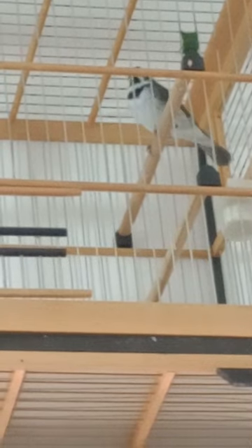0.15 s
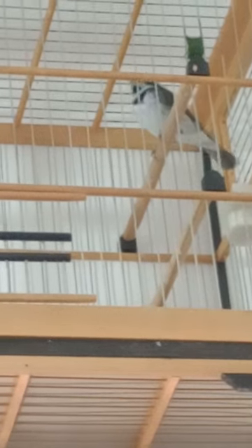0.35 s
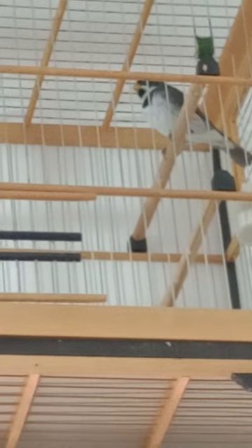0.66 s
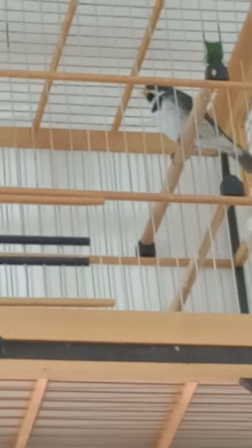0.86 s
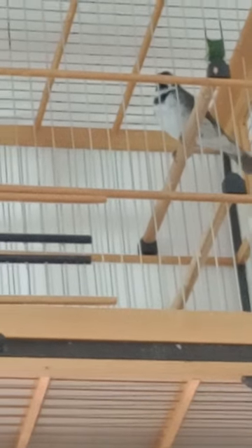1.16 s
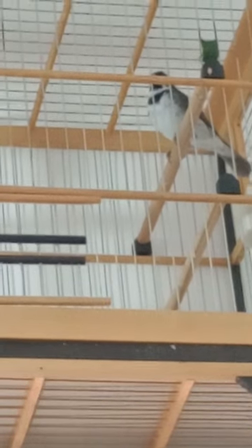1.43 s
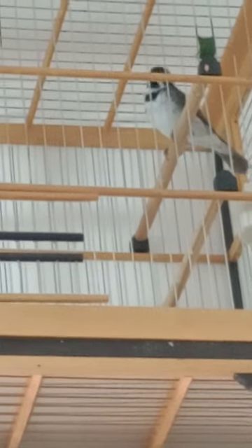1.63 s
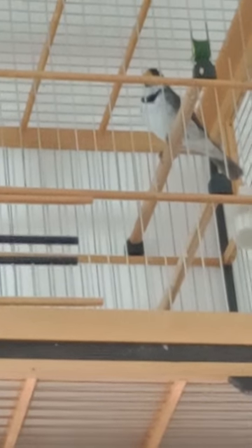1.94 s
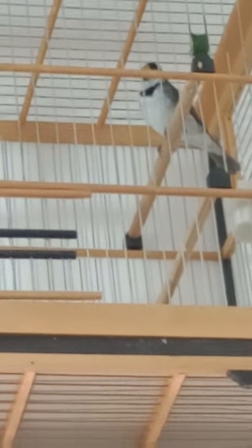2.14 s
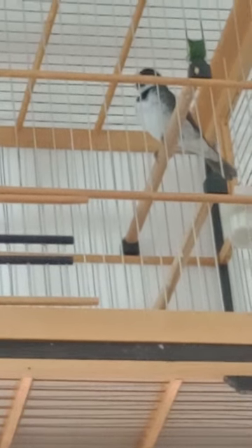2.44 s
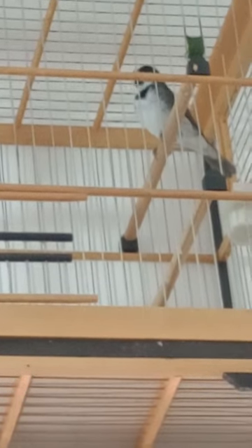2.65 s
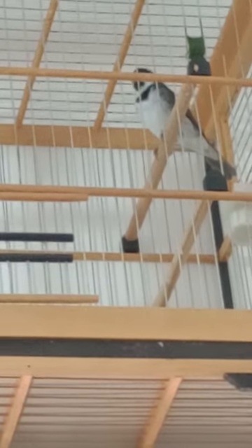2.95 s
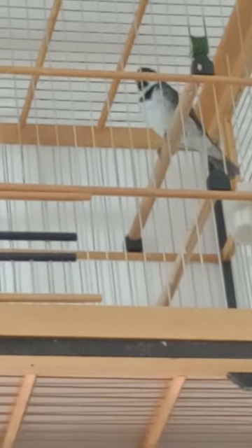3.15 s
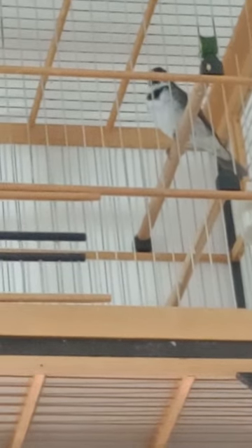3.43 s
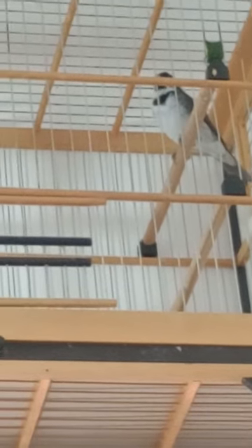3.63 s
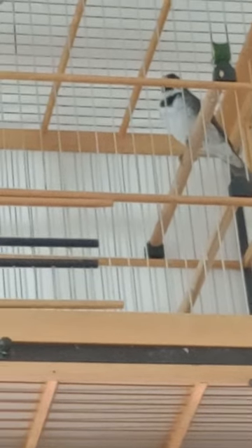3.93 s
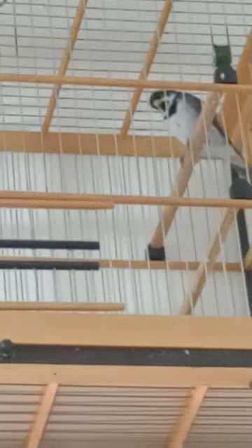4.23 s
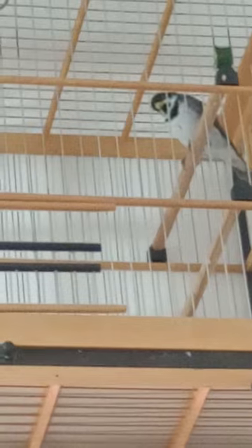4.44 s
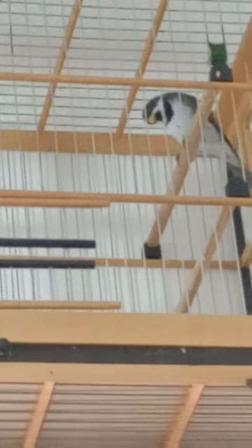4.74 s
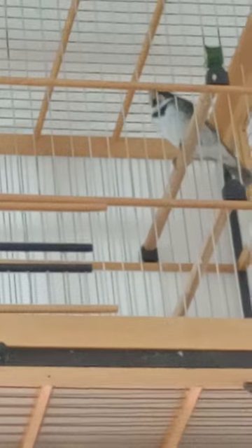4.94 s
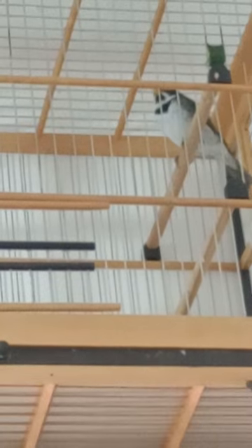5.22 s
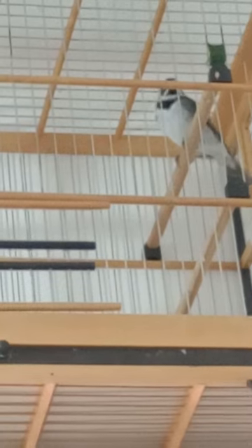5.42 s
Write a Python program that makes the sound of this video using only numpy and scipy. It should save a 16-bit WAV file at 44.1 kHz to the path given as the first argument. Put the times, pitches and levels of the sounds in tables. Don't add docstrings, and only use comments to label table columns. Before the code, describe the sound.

A small caged finch sings one varied phrase: chip, buzzes, fast trill, rising whistles, tumbling notes, then four slow falling slurs.

```python
import sys
import numpy as np
from scipy import signal
from scipy.io import wavfile
from scipy.ndimage import uniform_filter1d

SR = 44100
rng = np.random.default_rng(int(sys.argv[2]) if len(sys.argv) > 2 else 0)


def how_loud(loudness_db):
    steps = np.asarray(loudness_db, float) / 20
    return 10 ** steps


def wav_out(sig):
    wavfile.write(sys.argv[1], SR, np.round(np.clip(np.atleast_2d(sig).T, -1, 1) * 32767).astype(np.int16))


N = 246078

PURE_DB = [0, -28, -34]
PIP_OVERTONES_DB = [-4.5, -6.5, -12, -3.5, 0.5]
# seconds from its start, pitch in Hz, effort in dB, warble in Hz.
PIP = [(-.009, 1348, -47, 0), (-.005, 1480, -30.5, 0), (-.001, 1500, -22.5, 0)]
# frequency in Hz, gain in dB.
BEAK = [(3000, 7), (5500, -13.5), (6800, 2), (7600, -0.5), (8600, -2), (9800, -4), (11500, 2), (13000, 1.5),
        (16000, -4)]


def evened(x):
    return x / np.sqrt(np.mean(x ** 2) + 1e-20)


def read(points, hz):
    f, value = np.transpose(points)
    return np.interp(np.log(hz + 1), np.log(f + 1), value)


def add(mix, start_s, sound):
    part = mix[round(start_s * SR):][:len(sound)]
    part += sound[:len(part)]


def smooth(x, width_s):
    return uniform_filter1d(x, max(round(width_s * SR), 1), mode="nearest")


def wander(count, width_s):
    x, size = rng.standard_normal((count, SR // 2)), round(width_s * SR)
    x = uniform_filter1d(x, size, mode="wrap")
    return evened(uniform_filter1d(x, size, mode="wrap"))


def hush():
    # frequency in Hz, level in dB.
    floor = [(12, -56.5), (20, -22), (37, -17), (85, -3), (406, -11), (454, -6.5), (494, -13), (600, -12.5),
             (1880, -20), (2490, -18.5), (2780, -20), (3670, -21.5), (15600, -26.5)]
    # time in seconds, level in dB.
    rumble = [(0, -75.5), (1.5, -74), (3, -73.5), (4.5, -72), (5.58, -69)]
    level_db, size, hop = -64.5, 1024, 256
    frames, hz = N // hop + 5, np.fft.rfftfreq(size, 1 / SR)
    real, imag, patches = rng.standard_normal((frames, 513, 3)).T
    patches = evened(uniform_filter1d(uniform_filter1d(patches, 20, 0), 16, 1))
    s, rumble_db = np.transpose(rumble)
    swell_db = np.interp(np.arange(frames) * hop / SR, s, rumble_db - rumble_db.mean())
    low = 1 / (1 + (hz[:, None] / 300) ** 2)
    shape_db = read(floor, hz)[:, None] + low * swell_db + 0.61 * (-0.5 - low) * patches
    z = (real + 1j * imag) * how_loud(shape_db)
    noise = signal.istft(z, nperseg=size, noverlap=size - hop)[1][:N]
    return how_loud(level_db) * evened(noise)


def ticks():
    # start in seconds, level in dB, centre in Hz.
    rows = [(.28, -57, 2970), (1.792, -49, 1480), (2.45, -57, 1400), (2.87, -55.5, 1400),
            (3.474, -49, 3000), (3.799, -58, 2924)]
    out, t = np.zeros(N), np.arange(1200) / SR
    for start_s, level_db, hz in rows:
        band = signal.butter(1, [hz / 4.5, min(hz * 4.0, 18000)], "band", fs=SR)
        puff = evened(signal.lfilter(*band, rng.standard_normal(len(t))))
        add(out, start_s, how_loud(level_db) * puff * np.exp(-t / 0.0076))
    return out


def voice(hz, effort_db, depth_hz, overtones_db, beak=BEAK):
    warble_hz, warble_chance, jitter_hz = 104.5, .3, 18
    breath_db, patchy_db, edge_s = -30.5, 2, 0.0022
    t, chance = np.arange(len(hz)) / SR, rng.standard_normal(SR // 2)
    uneven = np.tanh(wander(1, .0015)[0])[:len(t)]
    warble = np.sin(2 * np.pi * warble_hz * t) + warble_chance * uneven
    hz = hz + depth_hz * warble + jitter_hz * uneven
    turn = 2 * np.pi * np.cumsum(hz) / SR
    flicker_db = patchy_db * wander(8, 0.014)[:, :len(t)]
    tone = np.zeros(len(t))
    for k, db in enumerate(overtones_db, 1):
        colour_db = (k > 1) * (read(beak, k * hz) + flicker_db[k])
        tone += how_loud(db + colour_db) * (k * hz < 19000) * np.sin(k * turn)
    air = how_loud(breath_db) * np.sqrt(np.abs(depth_hz) / 500) * np.diff(chance[:len(t)], prepend=0)
    edge = np.clip(np.minimum(t, t[::-1]) / edge_s, 0, 1)
    return how_loud(effort_db) * (np.sqrt(2) * tone + air) * np.sin(edge * np.pi / 2) ** 2


def whistle(mix, rows, overtones_db, start_s=0, factor=1, db=0, beak=BEAK):
    s, *curves = np.transpose(rows)
    t = np.arange(s[0], s[-1], 1 / SR)
    round_s = min(0.073 * (s[-1] - s[0]), .012)
    hz, effort_db, depth_hz = (smooth(np.interp(t, s, c), round_s) for c in curves)
    add(mix, start_s + s[0], voice(factor * hz, effort_db + db, depth_hz, overtones_db, beak))


def glide(mix, start_s, length_s, first_hz, last_hz, db, kind, overtones_db):
    # (share of the note at full effort, entry in dB, swell roundness, exit in dB, fade roundness).
    kinds = dict(flick=((1.1, 3, 0), (.8, -7, .6, -28, 1.1)), blip=((1.1, 2.1, 0),
             (.03, -1, 1.1, -25, .65)), drop=((1.35, 2.2, 0), (.22, -1.5, 1.1, -3.5, .8)),
             hook=((1.1, 1.1, 160), (.97, -22, 1.15, -1, 1.1)), catch=((1.1, 2.2, 130),
             (.7, -17, 1.1, -9, 1.1)), land=((1.5, 1.5, 0), (.25, -4, 1.1, -11, 1.1)), thin=((1.1, 1.1, 0),
             (.95, -6.5, 1.2, -1, 1.1)), short_slur=((1.15, 1.8, 0), (.5, -20, 3, -20, 1.8)),
             long_slur=((.9, 1.15, 0), (.3, -27, 3, -22, 1.35)), late_slur=((2.1, 1.4, 0),
             (.45, -17, 4.5, -18, 2.2)))
    (linger, ease, warble_hz), (crest, entry_db, swell, exit_db, fade) = kinds[kind]
    u, crest = np.linspace(0, 1, num=40), np.clip(crest, .02, .98)
    way = 1 - (1 - u ** linger) ** ease
    hz = first_hz * (last_hz / first_hz) ** way
    swell_db = entry_db * np.clip(1 - u / crest, 0, 1) ** swell
    fade_db = exit_db * np.clip((u - crest) / (1 - crest), 0, 1) ** fade
    rows = np.transpose([u * length_s, hz, swell_db + fade_db, warble_hz * np.sqrt(way)])
    whistle(mix, rows, overtones_db, start_s, db=db)


def chip(song):
    chip_db = [0, -17.5]
    # start in seconds, length in seconds, first Hz, last Hz, effort in dB.
    rise = (.433, .019, 6280, 7480, -27)
    end = (.450, .011, 6000, 6800, -31)
    glide(song, *rise, "flick", chip_db)
    glide(song, *end, "blip", chip_db)


def buzz(song, start_s, length_s, top_hz, effort_db, period_s):
    # share of the period, pitch factor, effort in dB.
    sag = [(0, .55, -9.5), (.1, .86, 0), (.22, .98, 0), (.55, 1, -0.5), (0.799, .8, 1.5), (0.969, 0.57, -9)]
    buzz_db = [1, -7, -5, -9.5, -9, -21]
    # frequency in Hz, gain in dB.
    buzz_beak = [(2500, -9), (3700, 18), (5000, 2.5), (6300, -0.5), (7300, 8), (8500, 5.5), (9600, 1.5),
                 (11700, 5), (13300, -5), (16000, -15.5)]
    entry_factor, warble_hz, pace_chance = .43, 75, .08
    arch_share, fade_db = .03, -1.5
    t = np.arange(0, length_s, 1 / SR)
    share, factor, sag_db = np.transpose(sag)
    drift = wander(1, .02)[0, :len(t)]
    place = (t / period_s + pace_chance * drift * np.minimum(t / period_s, 1)) % 1
    entry = np.interp(t, [0, share[1] * period_s], [entry_factor / factor[0], 1])
    arch = 1 - arch_share * (2 * t / length_s - 1) ** 2
    hz = top_hz * arch * entry * smooth(np.interp(place, share, factor), 0.0023)
    db = effort_db + fade_db * t / length_s + smooth(np.interp(place, share, sag_db), 0.0011)
    add(song, start_s, voice(hz, db, warble_hz, buzz_db, buzz_beak))


def buzzes(song):
    # start in seconds, length in seconds, top pitch in Hz, effort in dB, sag period in seconds.
    rows = [(.713, .217, 2900, -48.5, .036), (.998, .177, 2940, -45.5, .0425),
            (1.208, .147, 3020, -43.5, .042)]
    for row in rows:
        whistle(song, PIP, PIP_OVERTONES_DB, row[0] + .008, .9, row[3] + 20)
        buzz(song, *row)


def trill(song):
    # seconds after its start, pitch in Hz, effort in dB, warble in Hz.
    syllable = [(0, 4145, 5, 58), (.007, 5140, -1.5, 100.5), (0.012, 6356, 7, -3.5), (0.014, 6540, 4.5, -1),
                (0.018, 5540, 1, 297.5), (.027, 4415, .5, 351.5), (.034, 3700, -2.5, 104),
                (.046, 3248, -4.5, 58.5), (0.054, 2793, -12, -1.5)]
    # start in seconds, pitch factor, effort in dB.
    repeats = [(1.397, 0.95, -32.5), (1.472, 0.99, -31.5), (1.552, 0.97, -31.5), (1.636, 1, -30),
               (1.72, 0.99, -30), (1.805, 0.96, -31), (1.891, 0.96, -29.5)]
    trill_db = [-1, -16.5, -29.5, -34.5]
    # frequency in Hz, gain in dB.
    trill_beak = [(5500, -2), (6900, 5), (7500, -2), (8800, -15), (10200, -5), (12500, -6), (14000, -12),
                  (16000, -16)]
    for start_s, factor, db in repeats:
        whistle(song, syllable, trill_db, start_s, factor, db, trill_beak)
        whistle(song, PIP, PIP_OVERTONES_DB, start_s, factor, db)


def lifts(song):
    # time in seconds, pitch in Hz, effort in dB.
    paths = [
        [(1.981, 2820, -33.5), (2.04, 3000, -27), (2.08, 3370, -22.5), (2.11, 3794, -14), (2.14, 3798, -24.5),
         (2.165, 3860, -46.5)],
        [(2.187, 2737, -40), (2.22, 2963, -25.5), (2.26, 3014, -30), (2.285, 3580, -20.5), (2.32, 3820, -18),
         (2.35, 3720, -28.5), (2.368, 3800, -60)],
    ]
    lift_db = [-3, -39.5, -34.5, -46.5, -46]
    # start in seconds, length in seconds, first Hz, last Hz, effort in dB.
    flare = (2.186, .03, 5560, 5760, -38)
    for rows in paths:
        whistle(song, [(*row, 0) for row in rows], lift_db)
    glide(song, *flare, "blip", [0])


def tumble(song, start_s, pace, factor, hook_db, landing_db):
    # seconds after the start, length in seconds, first Hz, last Hz, effort in dB.
    path = [
        (0, .063, 6700, 4950, -20.5),
        (.061, .022, 3750, 4800, -13),
        (.077, .032, 3250, 4200, -19.5),
        (.11, .047, 3350, 2880, -21.5),
        (.057, .043, 8200, 13000, -57.5),
    ]
    hooked_db = [0, -28.5, -29.5]
    parts = (("drop", PURE_DB, 0), ("hook", hooked_db, hook_db), ("catch", hooked_db, 0),
             ("land", PURE_DB, landing_db), ("thin", [0], 0))
    for (s, length_s, first_hz, last_hz, db), (kind, overtones_db, push_db) in zip(path, parts):
        glide(song, start_s + pace * s, pace * length_s, first_hz, factor * last_hz, db + push_db,
              kind, overtones_db)


def tumbles(song):
    # start in seconds, pace factor, factor on the last pitches, first hook in dB, landing in dB.
    rows = [(2.382, .92, 1.06, -8, -1.5), (2.576, 1.01, 1.01, .1, .1), (2.774, .99, .98, -2.5, -.5)]
    for row in rows:
        tumble(song, *row)


def thumps():
    # start in seconds, level in dB, pitch in Hz, decay in seconds.
    rows = [
        (3.008, -52, 120, .015),
        (3.022, -65, 390, .04),
        (4.985, -51.5, 150, .012),
    ]
    out, t = np.zeros(N), np.arange(8000) / SR
    for start_s, level_db, hz, decay_s in rows:
        push = np.sin(2 * np.pi * hz * t * (1 + 0.1 * np.exp(-t / 0.0033)))
        add(out, start_s, how_loud(level_db) * push * np.exp(-t / decay_s))
    return out


def arch(song):
    # time in seconds, pitch in Hz, effort in dB, warble in Hz.
    rows = [(3.028, 4930, -27.5, 0), (3.11, 5900, -29.5, 0), (3.15, 6610, -20, 0), (3.185, 6970, -21, 0),
            (3.208, 7150, -33.5, 58), (3.225, 5590, -27, 357), (3.255, 4680, -29, 500),
            (3.33, 4420, -22, 525), (3.385, 4204, -36, 492)]
    whistle(song, rows, PURE_DB)


def slurs(song):
    slur_db = [0, -33, -48, -37, -31.5, -40, -38]
    late_db = [0, -35, -50, -32, -45]
    # start in seconds, length in seconds, first Hz, last Hz, effort in dB.
    first = (3.84, .23, 3550, 2060, -35.5)
    long_slurs = [(4.13, .3, 3500, 1643, -33), (4.495, .275, 3460, 1628, -31.5)]
    last = (4.845, .305, 3250, 2187, -34.5)
    glide(song, *first, "short_slur", slur_db)
    for note in long_slurs:
        glide(song, *note, "long_slur", slur_db)
    glide(song, *last, "late_slur", late_db)


def finch():
    song = np.zeros(N)
    for phrase in (chip, buzzes, trill, lifts, tumbles, arch, slurs):
        phrase(song)
    return song


def far_bird():
    # time in seconds, pitch in Hz, effort in dB, warble in Hz.
    rows = [(4.223, 7700, -60, -7), (4.243, 8860, -54, 0), (4.253, 7280, -48, 305), (4.274, 8200, -57, 306),
            (4.3, 8200, -58.5, 299)]
    out = np.zeros(N)
    whistle(out, rows, [0])
    return out


def room(x):
    # frequency in Hz, t60 in seconds.
    decay = [(300, 0.3), (2000, 0.41), (4000, 0.29), (7000, 0.28), (12000, .24), (16000, 0.23)]
    # delay in seconds, level in dB.
    echoes = [(.0121, -11), (.0172, -13), (.034, -12)]
    tail_db, cage_db, cage_s = 2, -2, .005
    hz, t, z = signal.stft(rng.standard_normal(SR), SR, nperseg=128)
    tail = signal.istft(z * how_loud(-60 * t / read(decay, hz)[:, None]), SR, nperseg=128)[1]
    age = np.arange(len(tail)) / SR
    tail *= np.clip(age / .012, 0, 1)
    cage = rng.standard_normal(len(age)) * np.exp(-age / cage_s)
    tail = how_loud(tail_db) * tail / np.linalg.norm(tail) + how_loud(cage_db) * cage / np.linalg.norm(cage)
    for k, (delay_s, db) in enumerate(echoes):
        add(tail, delay_s, np.array([(-1) ** k * how_loud(db)]))
    return signal.fftconvolve(x, tail)[:N]


def scene():
    direct_db, far_db, level_db = -3, -1, -5
    near, far = finch(), ticks() + far_bird()
    direct = how_loud(direct_db) * (near + how_loud(far_db) * far)
    wet = room(near + far)
    return (how_loud(level_db) * (direct + wet) + thumps() + hush())[None]


def roll_off(x):
    return signal.sosfilt(signal.butter(12, 15800, fs=SR, output="sos"), x)


def record(dry):
    edge = signal.firwin(511, 15750, window=("kaiser", 9), fs=SR)
    return roll_off(signal.oaconvolve(dry, edge[None], "same"))


dry = scene()
out = record(dry)
wav_out(out)
```